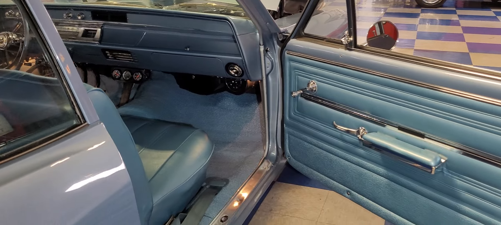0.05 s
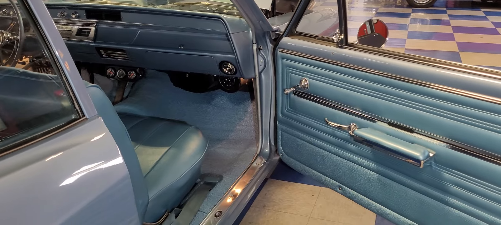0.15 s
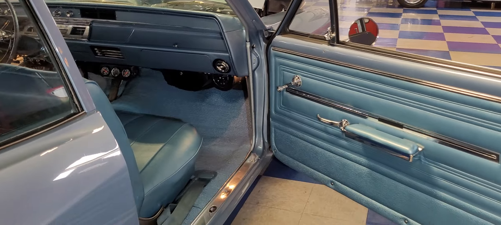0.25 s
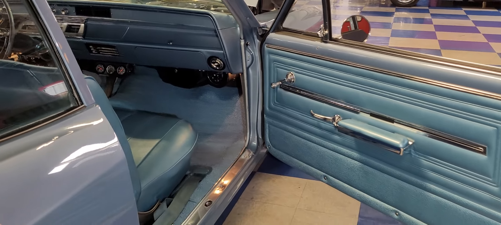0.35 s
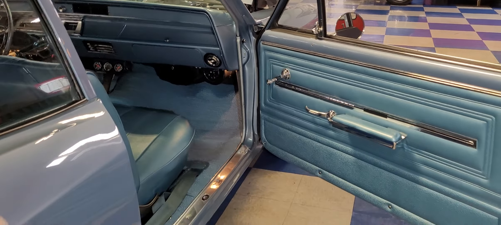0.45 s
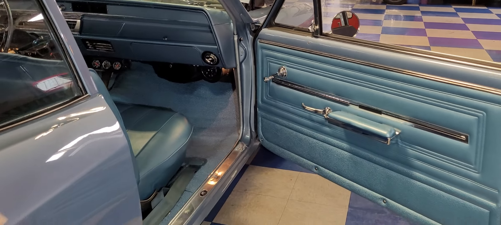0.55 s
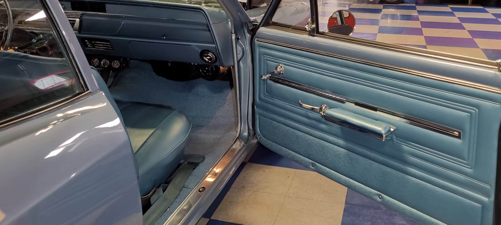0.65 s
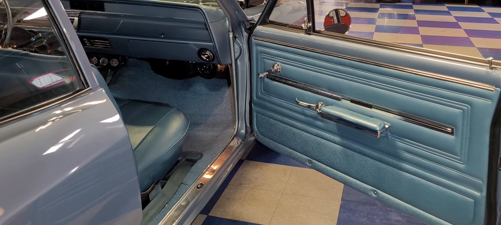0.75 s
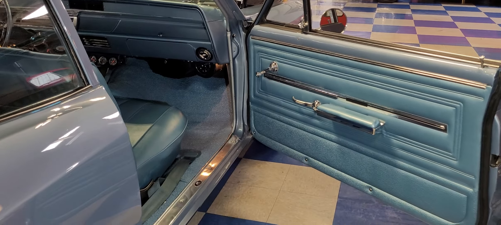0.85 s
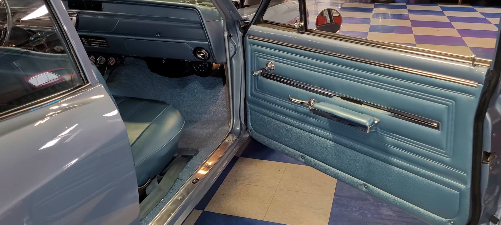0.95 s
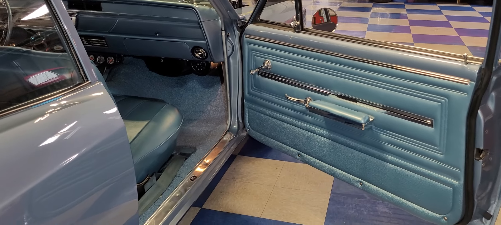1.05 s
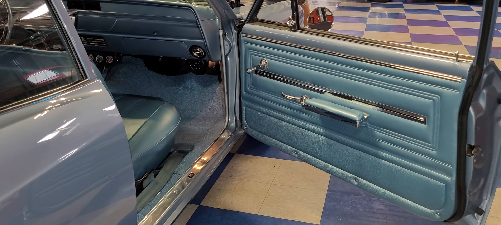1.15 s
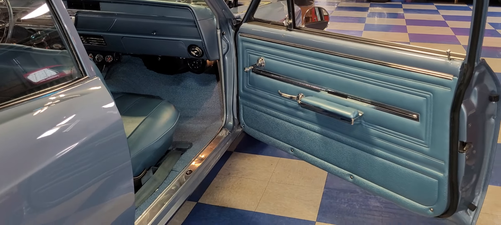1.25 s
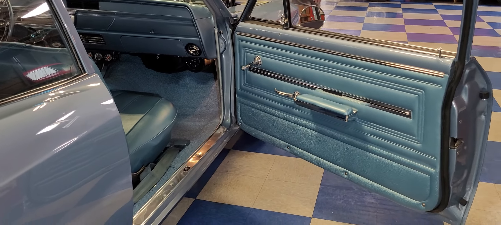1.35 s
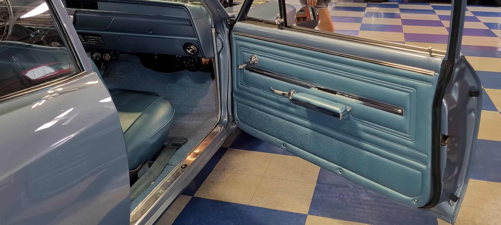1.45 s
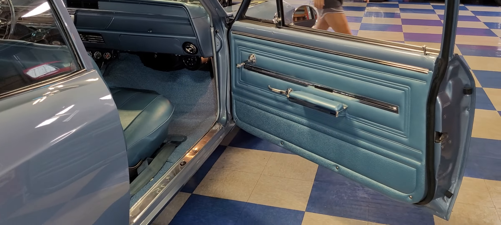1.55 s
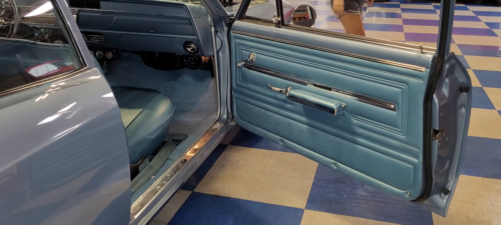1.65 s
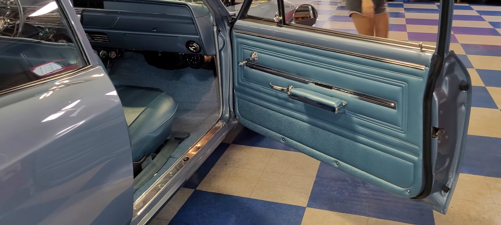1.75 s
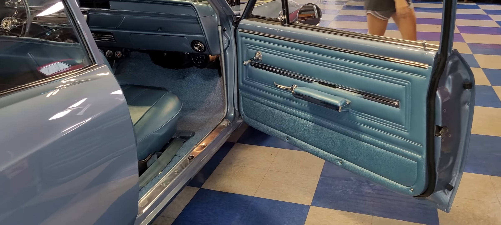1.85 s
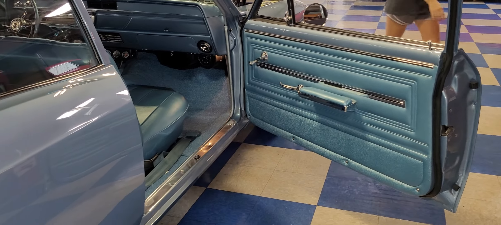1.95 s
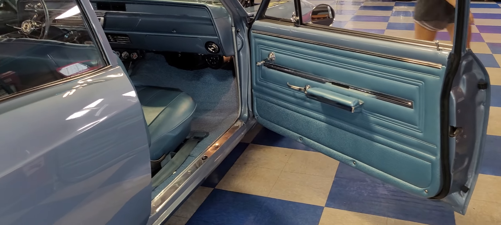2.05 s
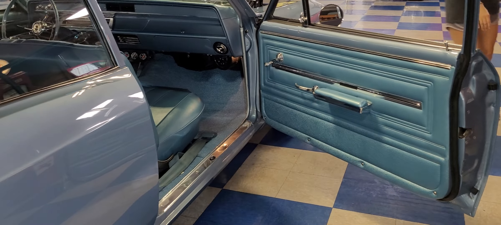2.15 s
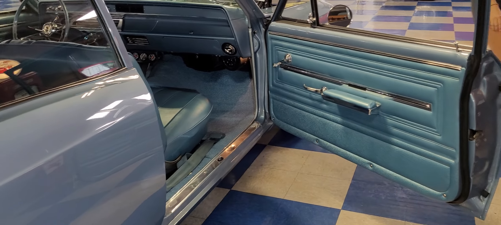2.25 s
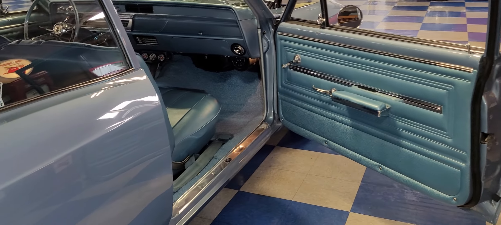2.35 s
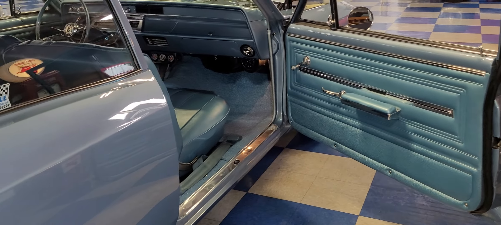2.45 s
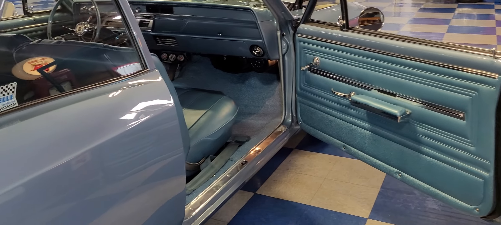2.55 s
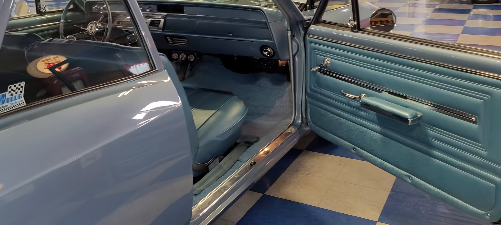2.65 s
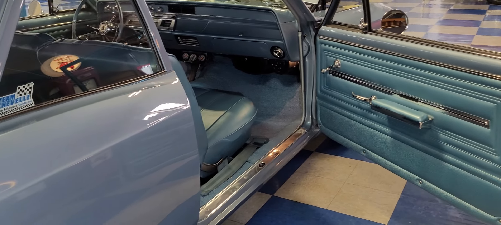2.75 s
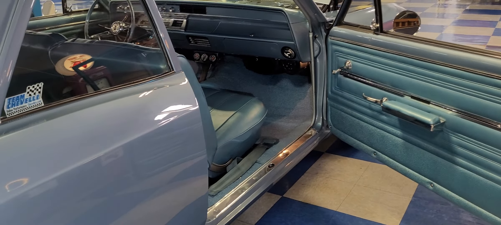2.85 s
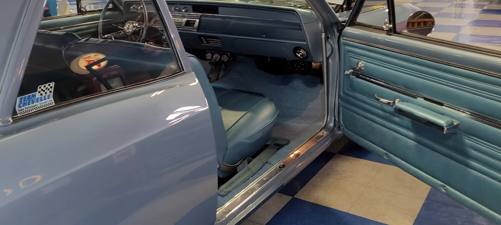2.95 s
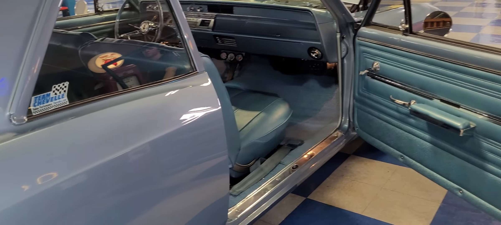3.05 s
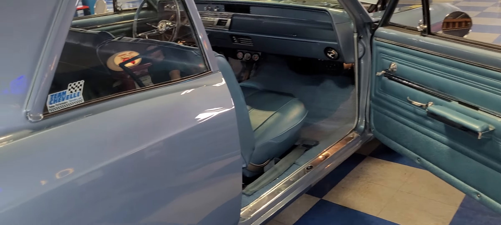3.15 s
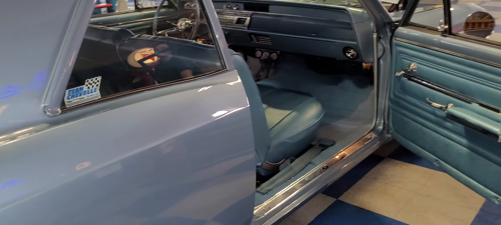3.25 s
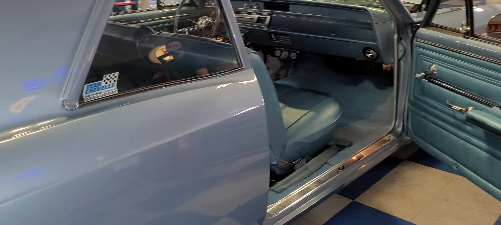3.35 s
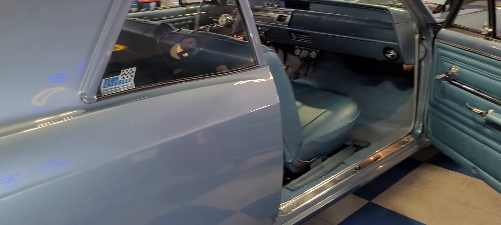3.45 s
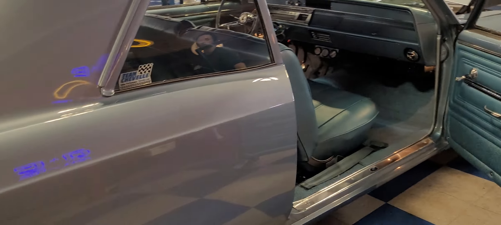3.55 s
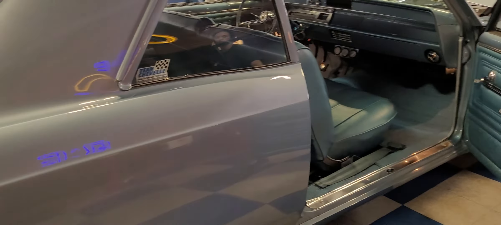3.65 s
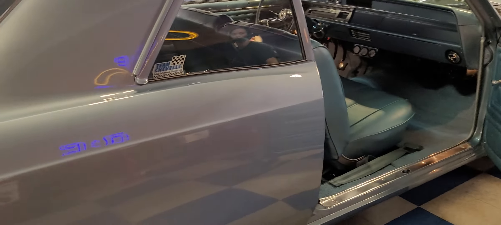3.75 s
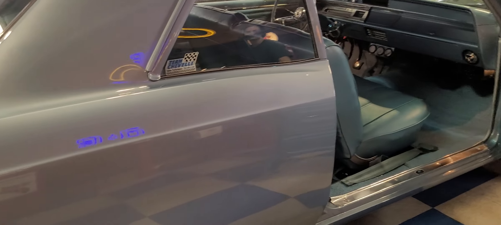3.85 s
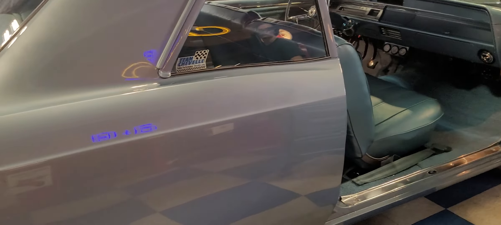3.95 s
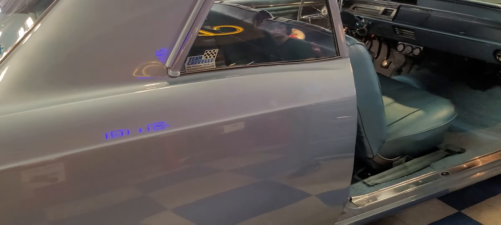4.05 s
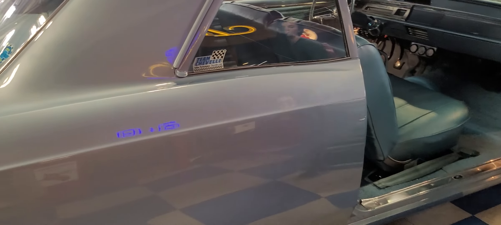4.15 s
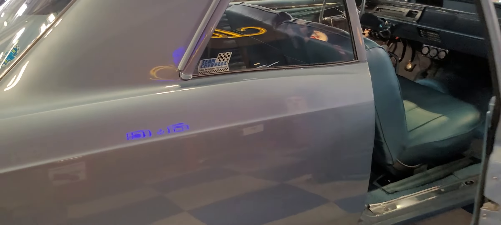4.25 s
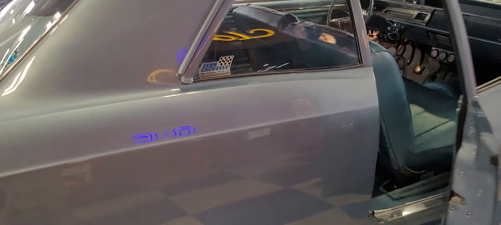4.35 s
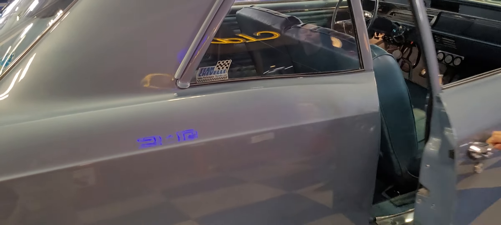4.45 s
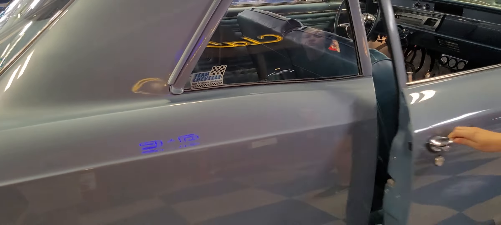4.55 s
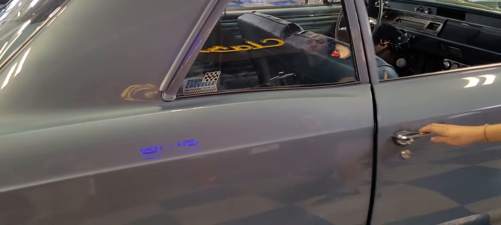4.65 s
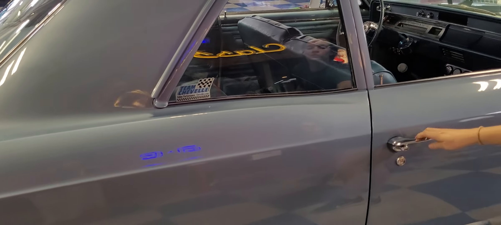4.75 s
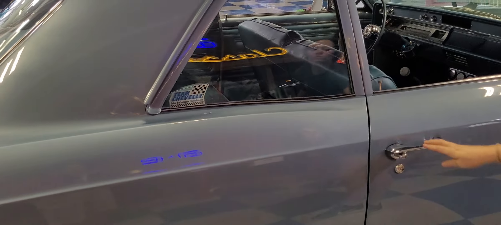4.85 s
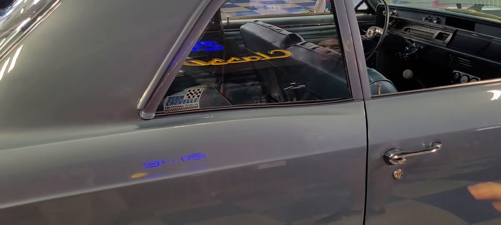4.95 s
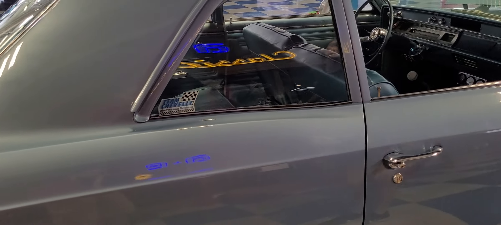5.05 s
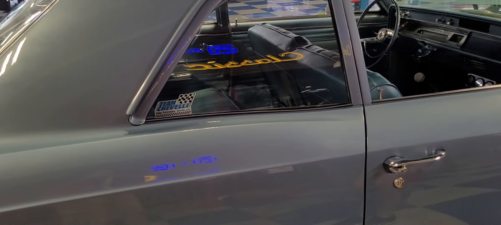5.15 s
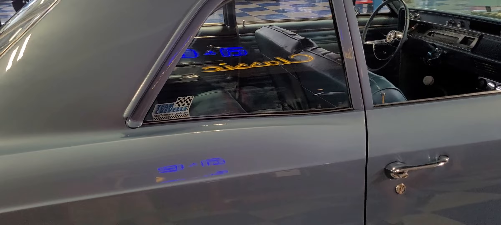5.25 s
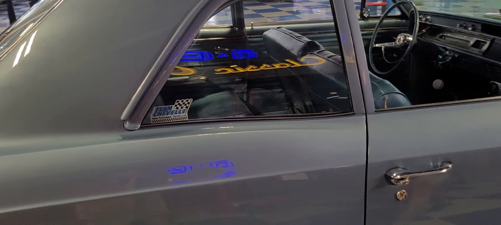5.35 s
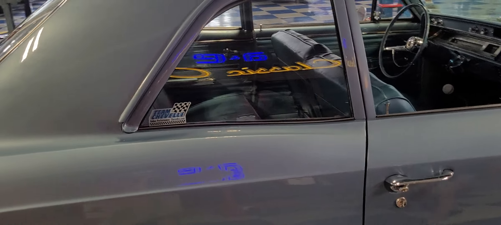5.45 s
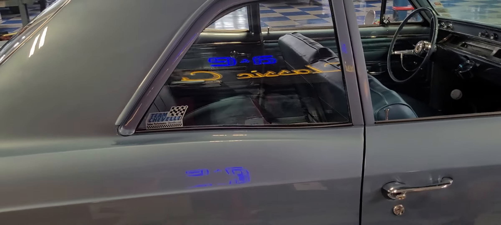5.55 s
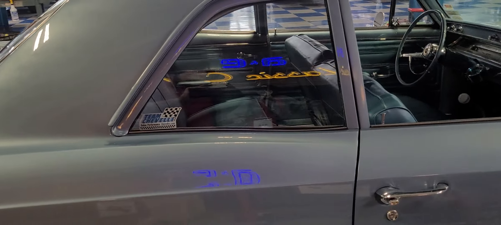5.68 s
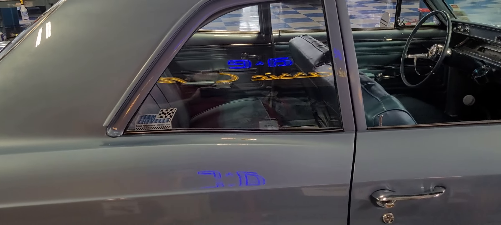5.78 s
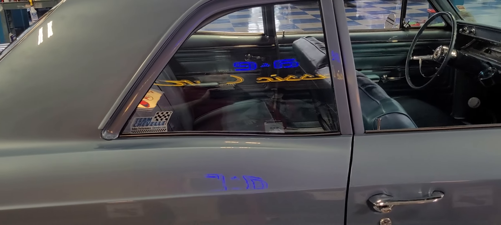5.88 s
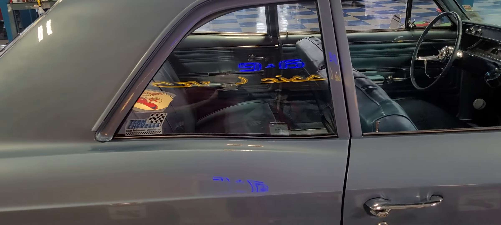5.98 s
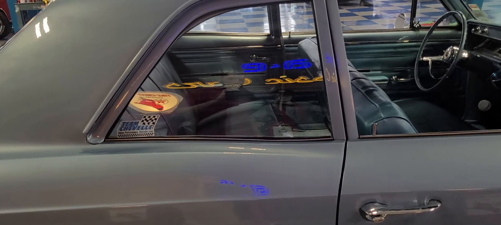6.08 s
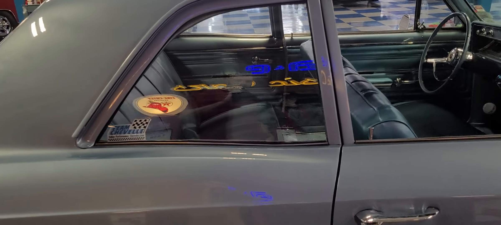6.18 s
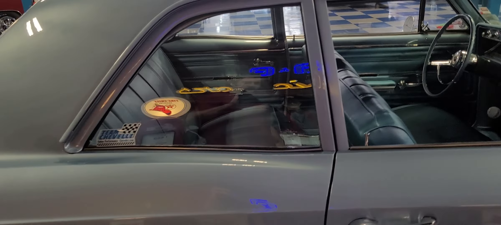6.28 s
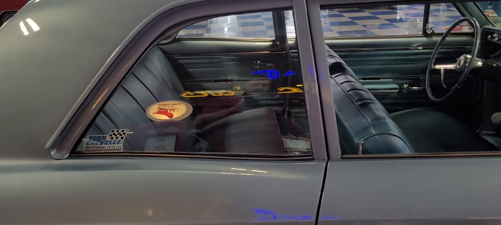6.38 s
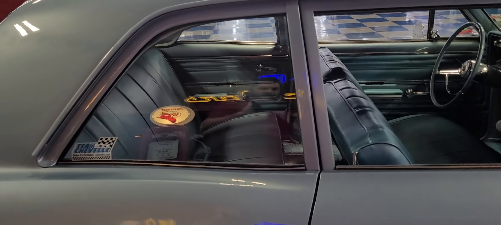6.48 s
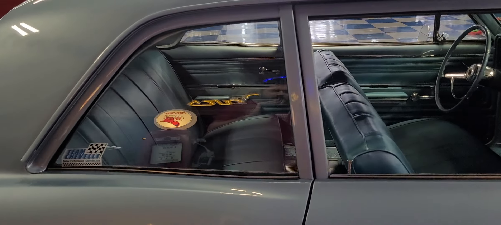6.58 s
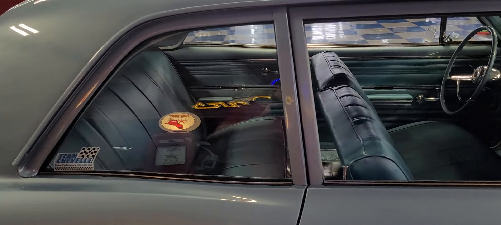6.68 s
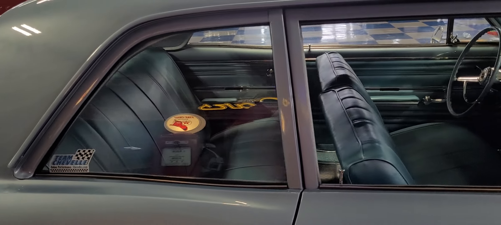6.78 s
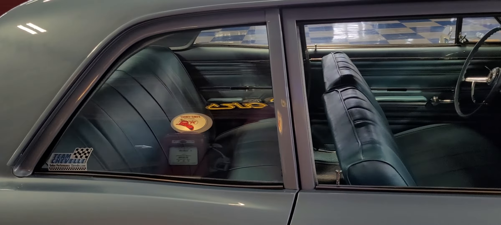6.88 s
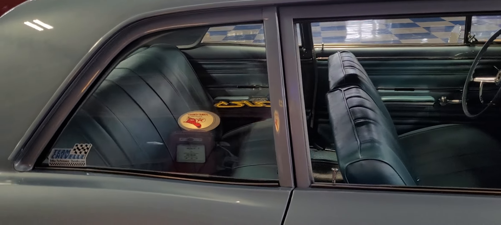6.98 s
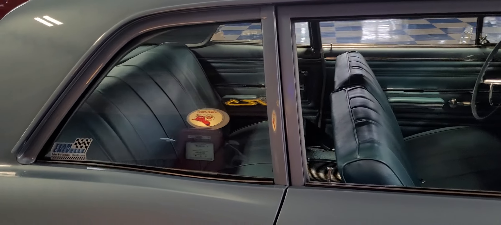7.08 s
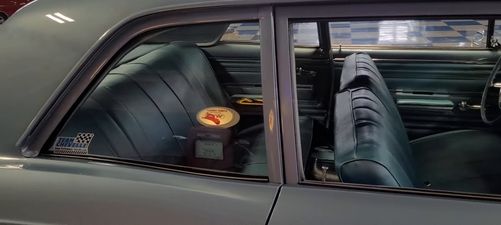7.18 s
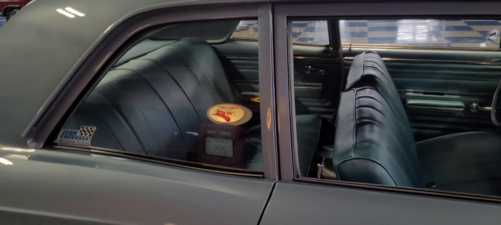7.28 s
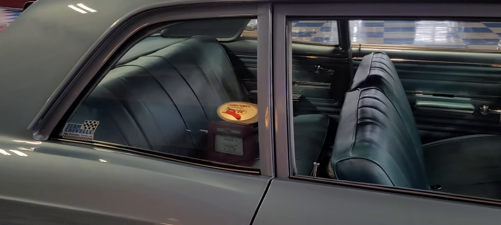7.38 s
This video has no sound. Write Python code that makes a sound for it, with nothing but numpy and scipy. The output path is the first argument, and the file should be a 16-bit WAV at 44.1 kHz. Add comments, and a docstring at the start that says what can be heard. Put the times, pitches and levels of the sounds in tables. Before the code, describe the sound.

A heavy old car door shuts once with a solid, echoing thump after a couple of light clicks, over low indoor ventilation rumble.

```python
"""A car door shut in a showroom

The heavy door of an old car swings shut close to a hand-held camera. The hinge slips and chatters, the
latch takes its first and second catch, and the door lands on its seals, driving the low modes of panel
and cabin into a boom that reverberates in the hall. Ventilation rumbles throughout, and the person
carrying the camera adds light clicks, footfalls and the friction noise of soles and sleeves."""
import sys
import numpy as np
from scipy import signal
from scipy.fft import rfft, irfft, next_fast_len
from scipy.io import wavfile
from scipy.ndimage import uniform_filter1d, map_coordinates

SR = 44100
rng = np.random.default_rng(int(sys.argv[2]) if len(sys.argv) > 2 else 0)


def persist_wave(psi):
    """Save psi, clipped to +-1, as 16-bit WAV."""
    counts = np.round(np.clip(psi, -1, 1) * 32767).astype(np.int16)
    wavfile.write(sys.argv[1], SR, np.atleast_2d(counts).T)


N = 327129
TIME = np.arange(N) / SR
AGE = TIME[:SR]  # seconds since the onset of a one-second event

# ventilation along the camera's path: time_s, rumble_db, duct_db
AIR_LEVELS = [(0, -39.5, -50), (3.2, -38, -48), (4.599, -38.5, -47), (5.2, -40, -48), (5.7, -43, -51.5),
              (6.7, -39.5, -46), (7.4, -38.5, -44)]
# spectra of ventilation rumble, duct noise and microphone hiss: frequency_hz, level_db
RUMBLE_SPECTRUM = [(15, -8), (30, -17.5), (48, -7.5), (74, 2), (92, -8.5), (115, -7), (160, -12.5),
                   (220, -30.5), (400, -95)]
DUCT_SPECTRUM = [(90, -8.5), (170, -3.5), (245, 1), (320, -4.5), (430, -14), (545, -10), (750, -17),
                 (1200, -23.5), (2500, -28), (6000, -52)]
HISS_SPECTRUM = [(300, 1), (1500, 2), (2300, -8.5), (2560, 11.5), (2850, 2), (6500, 0.5), (8500, -23),
                 (10500, -10), (12500, -3), (14100, -2.5), (15000, 17), (15900, -1)]
# tones of the fan: pitch_hz, level_db
FAN_TONES = [(543.7, 3), (694, -3)]
# the camera passes through the fan's standing waves: peak_s, level_db, half_length_s
FAN_ANTINODES = [(1.95, -60.5, 0.53), (4.5, -61.5, 0.63), (7.45, -63.5, .2)]
# likeness of left and right in the sound field: frequency_hz, correlation
COHERENCE = [(100, 0.97), (500, 0.75), (1200, -0.25), (2200, 0.056), (4000, -0.18), (7000, 0.03)]
# spectrum of the hall's reverberation: frequency_hz, level_db
HALL_SPECTRUM = [(30, -6), (52, -2), (80, 10), (170, 3), (400, 1.5), (750, -0.5), (1100, -5.5), (1800, -3),
                 (3000, 1), (4500, 1.5), (5350, 1), (6500, -1.5), (9000, 0), (15000, 0)]
# reverberation time: frequency_hz, t60_s
HALL_DECAY = [(60, 1.14), (250, 0.82), (700, 0.61), (2000, 1.21), (5500, 1.36), (9000, 1.15), (15000, 0.36)]

# sleeves rustle as the arms move: peak_s, level_db, half_length_s
SLEEVE_STROKES = [(2.32, -59, 0.016), (2.852, -66.5, 0.066), (3.114, -58, 0.037), (4.05, -49.5, 0.025),
                  (4.23, -52, 0.046), (5.62, -66, 0.025), (6.201, -59, 0.016), (6.472, -47.5, 0.015),
                  (6.66, -61.5, 0.072), (6.92, -54, .04)]
# spectrum of rubbing cloth: frequency_hz, level_db
CLOTH_SPECTRUM = [(300, -13), (1500, -3), (4500, -1.5), (6700, -0.5), (8600, -20), (11500, -6.5),
                  (15500, -10)]
# soles drag over the floor: peak_s, level_db, half_length_s
SOLE_DRAGS = [(1.17, -63, 0.056), (1.697, -59.5, .04), (7.267, -50.5, 0.11)]
# soles twist on the tiles, and at 6.42 s a hand rubs with the same gritty ring: peak_s, level_db,
# half_length_s, pitch_hz
SOLE_TWISTS = [(0.398, -56.5, 0.017, 1920), (3.59, -57, 0.043, 1920), (3.678, -47, .013, 1400),
               (5.621, -63, 0.036, 4340), (5.865, -56.5, .014, 2750), (5.931, -47, 0.023, 2500),
               (5.96, -48.5, .014, 1310), (6.419, -52, .014, 4000), (6.749, -48, .02, 2740),
               (6.908, -48.5, 0.042, 2420)]
# soft steps on the tiles: start_s, level_db
FOOTFALLS = [(2.505, -51), (3.022, -52), (4.097, -45), (4.435, -55), (6.515, -50)]
# fingers tick on the camera, and at 3.54 s its housing clicks: start_s, level_db, pitch_hz
FINGER_TICKS = [(.358, -46, 11400), (.503, -38.5, 12600), (.748, -39.5, 12300), (3.5409, -32, 5210),
                (6.465, -36, 9350)]
# the camera's housing clicks in the hand: start_s, ring_db, snap_db, knock_db
HOUSING_CLICKS = [(3.4173, -21.5, -28, -10.5), (3.5640, -45, -29, -16)]
# modes of the housing: pitch_hz, level_db, t60_s
HOUSING_MODES = [(3000, -4, 0.0073), (4650, -12, 0.0089), (5630, 1, 0.0088), (6300, -31, 0.0083),
                 (13300, -4.5, 0.0028)]

# the hinge slips as the door starts to swing: start_s, level_db, pitch_hz
HINGE_SLIPS = [(4.029, -38, 815), (4.097, -33.5, 623), (4.116, -32, 625), (4.133, -36, 680)]
# metal contacts of the closing door: start_s, crack_db, latch_db, shell_db
DOOR_CONTACTS = [(4.681, -44, -55.5, -40.5), (4.69, -17, -17, -25.5), (4.6938, -11, -19, -22.5),
                 (4.6979, -26.5, -13, -31), (4.7125, -8.5, -35, -16.5), (4.7194, -18.5, -27, -17),
                 (4.727, -18, -41, -22.5), (4.7407, -23.5, -22, -20)]
# spectra of a contact's crack and of the door shell's rattle: frequency_hz, level_db
CRACK_SPECTRUM = [(300, -1.5), (1800, 11), (3200, -15.5), (6000, 0.5), (7400, -5), (8700, -18.5),
                  (11000, -7.5), (13000, -7), (16000, -7.5)]
SHELL_SPECTRUM = [(100, -25), (300, -2.5), (620, 1.5), (850, -1.5), (1150, -5), (1400, -4.5), (1850, -4.5),
                  (2700, -11), (4000, -14), (6000, -15.5), (8700, -30.5), (12500, -16), (16000, -29)]
# modes of the latch and its plate: pitch_hz, level_db, t60_s
LATCH_MODES = [(591, -33.5, 0.059), (714, 3.5, 0.068), (846, 0, 0.077), (988, -9.5, 0.08),
               (1040, -5.5, 0.092), (1353, -9, .14), (1400, -21, 0.075), (1770, -15.5, 0.041),
               (1857, -18, 0.15), (2176, -29, 0.17)]
# the door lands on its seals, springs back and settles: start_s, level_db, rise_s, direction
SEAL_PUSHES = [(4.7186, -3.5, 0.014, -1), (4.7238, -2, .012, 1), (4.745, -12.5, 0.0023, 1)]
# modes of cabin air and door skin: pitch_hz, level_db, t60_s
CABIN_MODES = [(41, -16, .28), (54.7, -3, .2), (73.9, -19, 0.74), (85.4, -1, 0.055), (105.4, -4.5, 0.16),
               (123.7, -6.5, 0.16), (214.8, 0.5, 0.13), (244.8, -7, 0.17), (278.7, -29.5, 0.53),
               (344.5, -24.5, 0.49), (392.5, -15, 0.12), (585, -9.5, 0.15), (623.5, -8, 0.087),
               (664, -22.5, 0.19)]
# stereo balance of the door: frequency_hz, left_minus_right_db
DOOR_BALANCE = [(60, -2), (700, -0.5), (1300, -3), (2400, 1), (4400, -1), (8000, 7), (15000, 8.5)]

# the microphone's treble dip and the camera's bass cut: frequency_hz, gain_db
MICROPHONE_DIP = [(7000, 0), (8600, -16.5), (11000, -2.5), (15000, 1.5)]
BASS_CUT = [(10, -23.5), (24, -18), (36, 0.5)]


def amp(db):
    """Amplitude grows tenfold with every 20 dB."""
    return 10 ** (np.asarray(db) / 20)


def unit(x):
    """Normalisation to an rms of 1."""
    return x / np.sqrt(np.mean(x ** 2) + 1e-20)


def along(points, hz):
    """Interpolation of (frequency_hz, value) points on a logarithmic frequency axis."""
    knots_hz, values = np.transpose(points)
    return np.interp(np.log(hz + 1), np.log(knots_hz + 1), values)


def spectrum(points):
    """A magnitude response through (frequency_hz, level_db) points."""
    return lambda hz: amp(along(points, hz))


def resonance(centre_hz, q):
    """A second-order resonance, heard through the microphone's treble dip."""
    dip = spectrum(MICROPHONE_DIP)
    return lambda hz: dip(hz) / np.sqrt(1 + q ** 2 * (hz / centre_hz - centre_hz / (hz + 1)) ** 2)


def decay(t60_s):
    """Exponential damping: 60 dB are lost in t60_s."""
    return np.exp(-np.log(1000) * AGE / t60_s)


def rise(time_s):
    """Exponential build-up with time constant time_s."""
    return 1 - np.exp(-AGE / time_s)


def swell(t, half_s):
    """A skewed Gaussian that peaks at t = 0 and rises faster than it falls."""
    width_s = half_s * np.where(t < 0, 0.84, 1.07)
    return np.exp(-0.5 * (t / width_s) ** 2)


def swells(rows):
    """The summed envelope of (peak_s, level_db, half_length_s) swells."""
    return sum(amp(db) * swell(TIME - peak_s, half_s) for peak_s, db, half_s in rows)


def wobble(knots_per_s):
    """Slow random modulation: a spline through Gaussian values."""
    return map_coordinates(rng.standard_normal(int(N * knots_per_s / SR) + 4), [TIME * knots_per_s])


def lagged(x, time_s):
    """A first-order lag with time constant time_s."""
    keep = np.exp(-1 / (time_s * SR))
    return signal.lfilter([1 - keep], [1, -keep], x)


def pan(left_minus_right_db):
    """A level difference between the channels gives direction."""
    return amp(np.array([[0.5], [-0.5]]) * left_minus_right_db)


def narrowed(x, width):
    """The side signal sets apparent width: 0 is a point, 1 leaves the sound as it is."""
    mid = x.mean(0)
    return mid + width * (x - mid)


def add(track, start_s, sound):
    """Superposition of a sound on a track."""
    start = round(start_s * SR)
    track[:, start:start + sound.shape[-1]] += sound[..., :N - start]


def filtered(x, response):
    """Linear filtering multiplies the spectrum by a frequency response."""
    size = next_fast_len(x.shape[-1] + SR // 2)
    hz = np.fft.rfftfreq(size, 1 / SR)
    return irfft(rfft(x, size) * response(hz), size)[..., :x.shape[-1]]


def noise(colour, size=SR):
    """Partly coherent stereo noise of rms 1: alike in the bass, unrelated in the treble."""
    def mid_and_side(hz):
        angle = np.arccos(np.clip(along(COHERENCE, hz), -1, 1)) / 2
        return colour(hz) * np.array([np.cos(angle), np.sin(angle)])
    mid, side = filtered(rng.standard_normal((2, size)), mid_and_side)
    return unit(np.array([mid + side, mid - side]))


def friction(colour, grit_db, size=N):
    """Sliding friction: noise of rms 1, modulated into uneven grains."""
    grains = unit(uniform_filter1d(rng.standard_normal(size), size=130))
    return unit(amp(grit_db * grains) * noise(colour, size))


def ring(modes):
    """Free vibration is a sum of damped sinusoidal modes."""
    return sum(amp(db) * decay(t60_s) * np.sin(2 * np.pi * hz * AGE) for hz, db, t60_s in modes)


def tick(pitch_hz, q, t60_s):
    """A small, hard impact excites a brief burst of resonant noise."""
    return noise(resonance(pitch_hz, q)) * decay(t60_s)


def ventilation():
    """Moving air makes broadband noise; the fan's tones swell at the antinodes of standing waves."""
    times_s, rumble_db, duct_db = np.transpose(AIR_LEVELS)
    rumble_gain = amp(np.interp(TIME, times_s, rumble_db) + 1.06 * wobble(7))
    rumble = rumble_gain * noise(spectrum(RUMBLE_SPECTRUM), N)
    duct = amp(np.interp(TIME, times_s, duct_db)) * noise(spectrum(DUCT_SPECTRUM), N)
    fan = np.zeros(N)
    for hz, db in FAN_TONES:
        fan += amp(db + 1.44 * wobble(4.3)) * np.sin(2 * np.pi * hz * TIME + 0.5 * wobble(6.7))
    return pan(-2) * (rumble + duct + swells(FAN_ANTINODES) * fan)


def microphone_hiss():
    """The microphone's self-noise sets a thin, steady floor."""
    return pan(0.62) * amp(-60) * noise(spectrum(HISS_SPECTRUM), N)


def hall(x):
    """Reverberation: convolution with a diffuse tail in which each frequency has its own decay time."""
    hz, age_s, bands = signal.stft(noise(spectrum(HALL_SPECTRUM)), SR, nperseg=256)
    damping = np.exp(-np.log(1000) * age_s / along(HALL_DECAY, hz)[:, None])
    _, tail = signal.istft(bands * damping, SR, nperseg=256)
    tail = tail[:, :SR] * rise(0.007)  # echoes take a moment to build up
    return signal.fftconvolve(x, tail / np.linalg.norm(tail[0]), axes=1)[:, :N]


def clothes():
    """Friction of cloth on cloth: short sleeve strokes over faint, unceasing fidgeting."""
    fidget = amp(-68.5 + 2.5 * wobble(6.7))
    return pan(1.5) * (swells(SLEEVE_STROKES) + fidget) * friction(spectrum(CLOTH_SPECTRUM), grit_db=3)


def sole(pitch_hz):
    """A rubbing sole has two resonances, whose powers add."""
    lower, upper = resonance(pitch_hz, q=4.5), resonance(1.75 * pitch_hz, q=4.5)
    return lambda hz: np.hypot(lower(hz), amp(-7.5) * upper(hz))


def shoes():
    """Friction and impact on tiles: soles drag dully, twist with a gritty ring and land softly."""
    out = swells(SOLE_DRAGS) * friction(resonance(1480, q=1.14), grit_db=2.5)
    for peak_s, db, half_s, hz in SOLE_TWISTS:
        lead_s = 4 * half_s
        rubbing = friction(sole(hz), grit_db=3.5, size=SR)
        add(out, peak_s - lead_s, amp(db) * swell(AGE - lead_s, half_s) * rubbing)
    heel_tap = amp(3.5) * decay(0.018)
    footfall = heel_tap + rise(0.0026) * decay(0.24)
    for start_s, db in FOOTFALLS:
        add(out, start_s, amp(db) * noise(resonance(1150, q=1.5)) * footfall)
    return out


def metal_ping():
    """A tiny, distant piece of metal vibrates freely in a single high mode."""
    out = np.zeros((2, N))
    add(out, start_s=5.762, sound=amp(-47) * decay(0.14) * np.sin(2 * np.pi * 13450 * AGE))
    return out


def fingers():
    """Light impacts of fingers on the camera and one click of its housing, louder at the nearer, left
    microphone port."""
    out = np.zeros((2, N))
    for start_s, db, hz in FINGER_TICKS:
        add(out, start_s, amp(db) * tick(hz, q=2, t60_s=0.0063))
    return pan(10) * out


def housing():
    """A snap excites the housing's modes beside the right port, which also picks up a damped knock."""
    out = np.zeros((2, N))
    snap_envelope = decay(0.006) + amp(-21.5) * decay(0.12)
    for start_s, ring_db, snap_db, knock_db in HOUSING_CLICKS:
        snap = amp(snap_db) * noise(resonance(3100, q=0.33)) * snap_envelope
        ringing = amp(ring_db) * ring(HOUSING_MODES)
        knock = amp(knock_db - 1.5) * decay(0.0018) * np.sin(2 * np.pi * 850 * AGE)
        add(out, start_s, pan(-16.5) * snap + pan(-9) * ringing + pan(-20) * knock)
    return out


def hinge():
    """The hinge slips out of its detent; the hollow door's resonance gives each slip a rough pitch."""
    out = np.zeros((2, N))
    for start_s, db, hz in HINGE_SLIPS:
        rough_tone = 0.68 * np.sin(2 * np.pi * hz * AGE) + 0.8 * noise(resonance(hz, q=1.52))
        add(out, start_s, amp(db) * rough_tone * rise(0.0019) * decay(0.052))
    return out


def hinge_spring(start_s=4.03, gap_s=0.027, loss_db=2):
    """The released spring chatters, losing energy with each impact."""
    out = np.zeros((2, N))
    for k in range(4):
        add(out, start_s + k * gap_s, amp(-37 - k * loss_db) * tick(6500, q=1.4, t60_s=0.0081))
    return pan(11) * out


def door():
    """Impacts excite the modes of latch and shell; the slower push on the seals booms the cabin."""
    out = np.zeros((2, N))
    latch, cabin = ring(LATCH_MODES), ring(CABIN_MODES)
    for start_s, crack_db, latch_db, shell_db in DOOR_CONTACTS:
        crack = amp(crack_db) * noise(spectrum(CRACK_SPECTRUM)) * decay(0.032)
        # glass, rods and steel skin have too many modes to tell apart
        shell = amp(shell_db) * noise(spectrum(SHELL_SPECTRUM)) * rise(0.001) * decay(0.22)
        add(out, start_s, narrowed(crack, 0.85) + narrowed(shell, 0.67) + amp(latch_db) * latch)
    # the window's metal trim rings on after the second catch
    trim = amp(-46) * noise(resonance(5300, q=14)) * decay(1.3)
    add(out, start_s=4.7125, sound=trim)
    for start_s, db, rise_s, direction in SEAL_PUSHES:
        add(out, start_s, direction * amp(db) * cabin * rise(rise_s))
    return filtered(out, lambda hz: pan(along(DOOR_BALANCE, hz)))


def scene():
    """Direct sound, reverberation and background noise add by superposition."""
    slam = door()
    small_sounds = fingers() + metal_ping() + shoes() + clothes() + hinge() + hinge_spring()
    direct = slam + small_sounds + housing()
    reverberation = hall(amp(-12) * slam + amp(-10.5) * small_sounds)
    return direct + reverberation + ventilation() + microphone_hiss()


def gain_control(x, threshold_db=-28.5, pull=0.38):
    """Compression: mean power above the threshold turns the gain down, and it recovers slowly."""
    power = lagged(np.mean(x ** 2, axis=0), time_s=0.34)
    excess_db = 10 * np.log10(np.maximum(power / amp(threshold_db) ** 2, 1))
    return x * amp(-pull * lagged(excess_db, time_s=0.32))


def record(dry):
    """The camera cuts the deepest bass, compresses, saturates softly on peaks and limits the band."""
    ceiling, band_limit_hz = 0.95, 15950
    compressed = gain_control(filtered(dry, spectrum(BASS_CUT)))
    rounded = compressed / (1 + np.abs(compressed / ceiling) ** 6) ** (1 / 6)
    return filtered(rounded, lambda hz: hz < band_limit_hz)


dry = scene()
out = record(dry)
persist_wave(out)
```